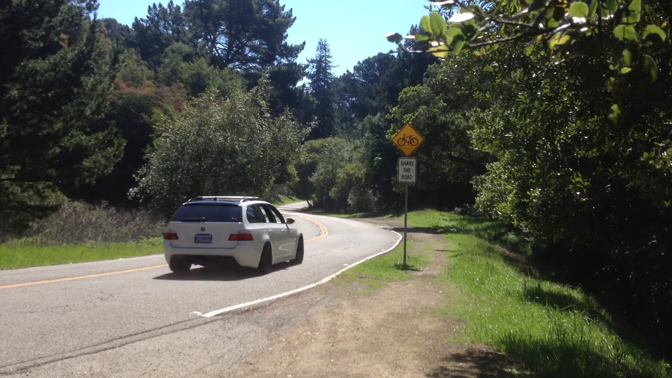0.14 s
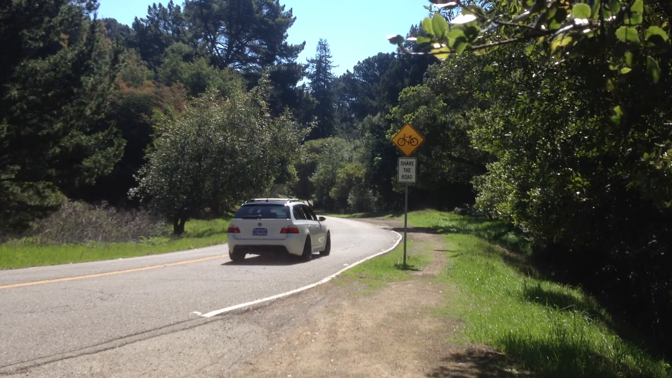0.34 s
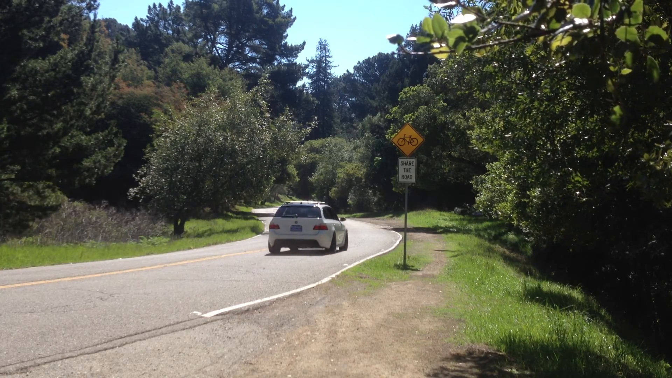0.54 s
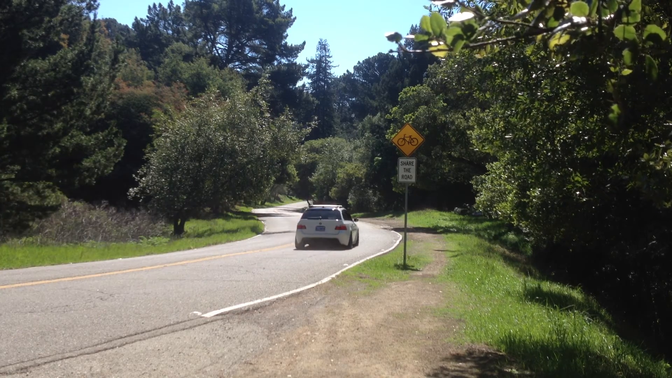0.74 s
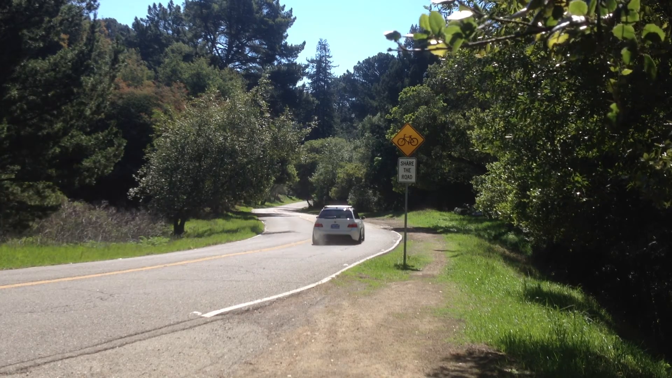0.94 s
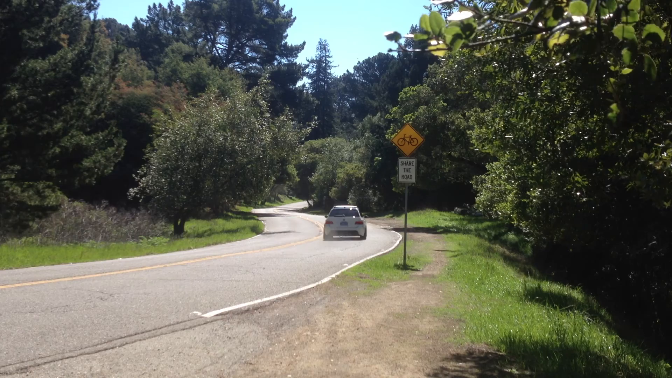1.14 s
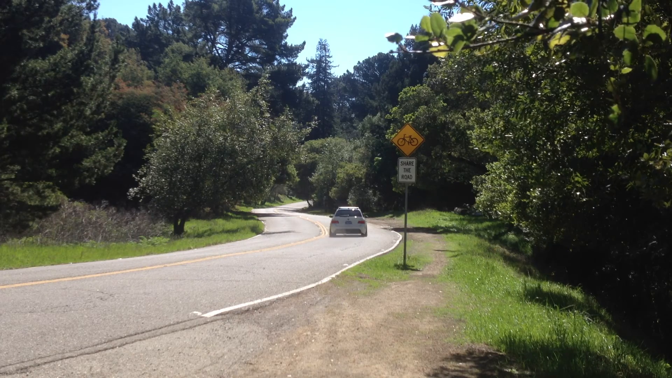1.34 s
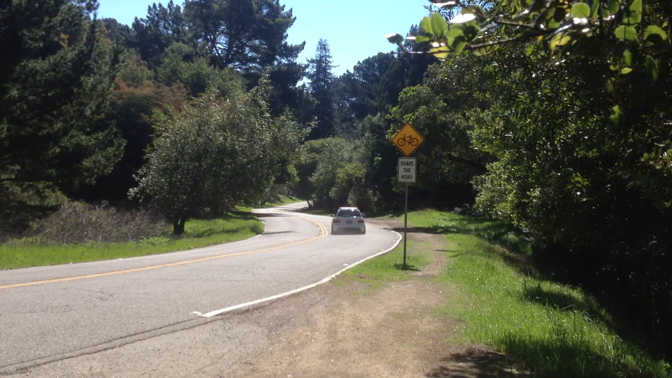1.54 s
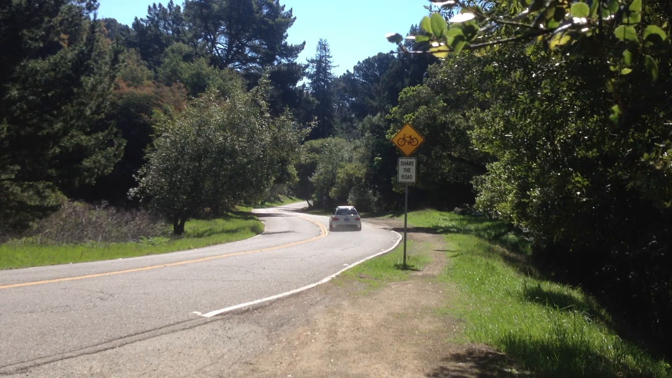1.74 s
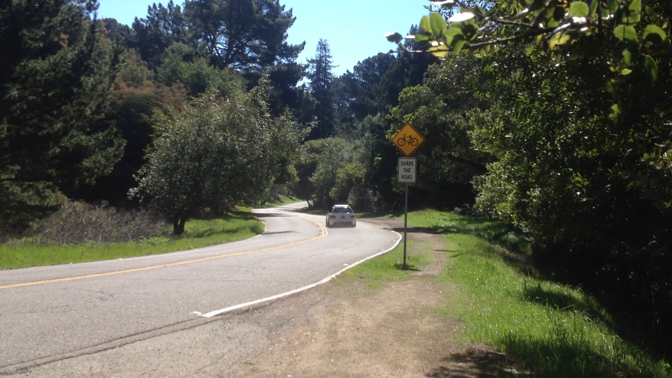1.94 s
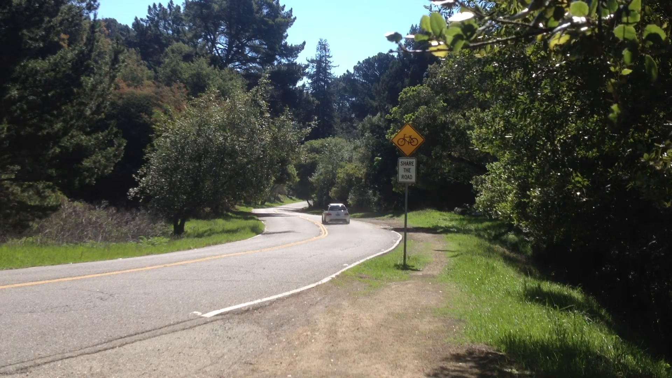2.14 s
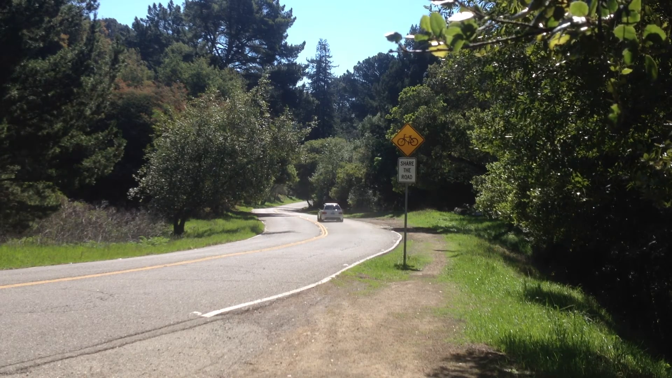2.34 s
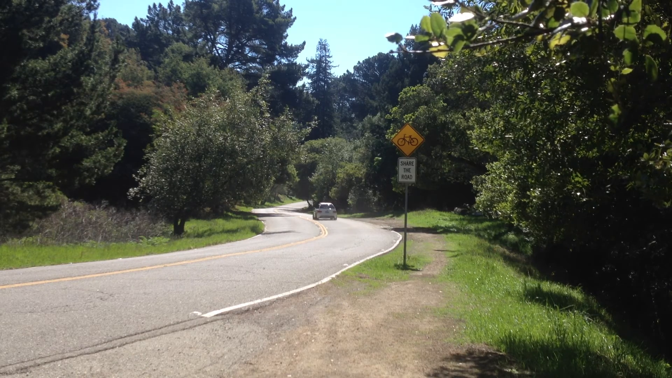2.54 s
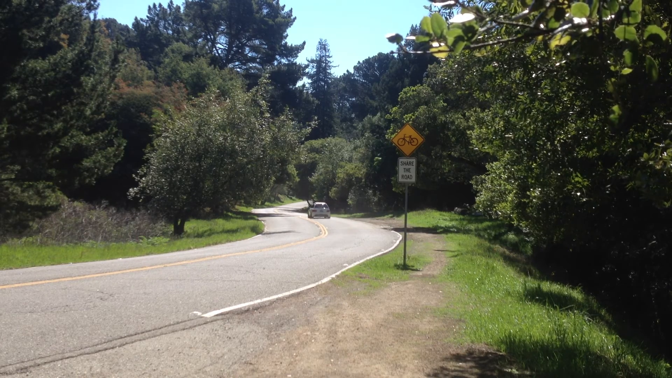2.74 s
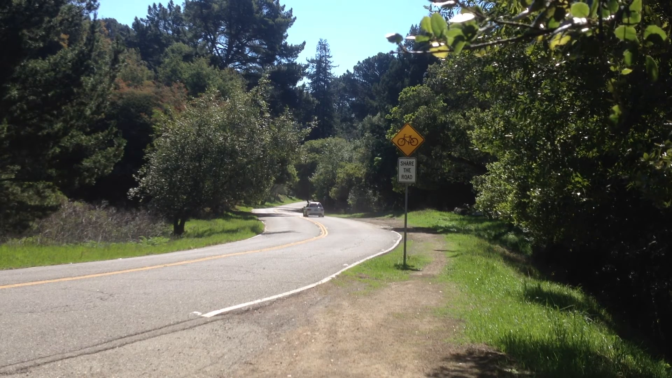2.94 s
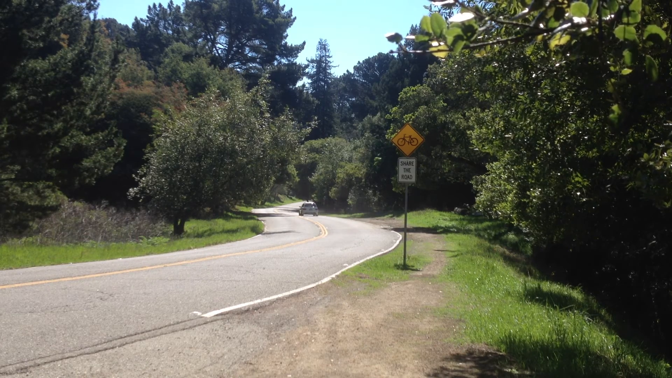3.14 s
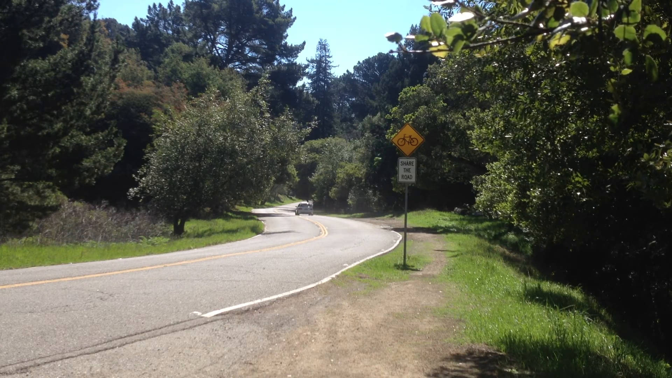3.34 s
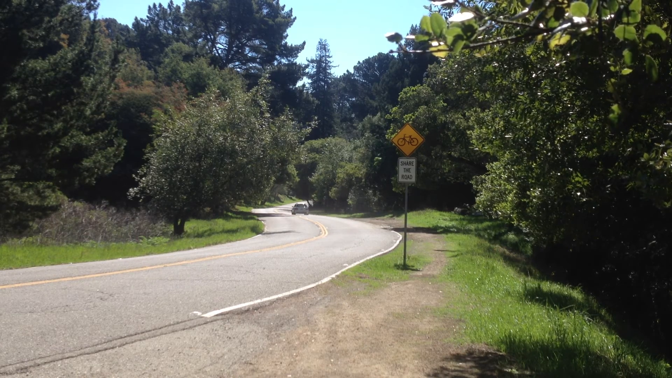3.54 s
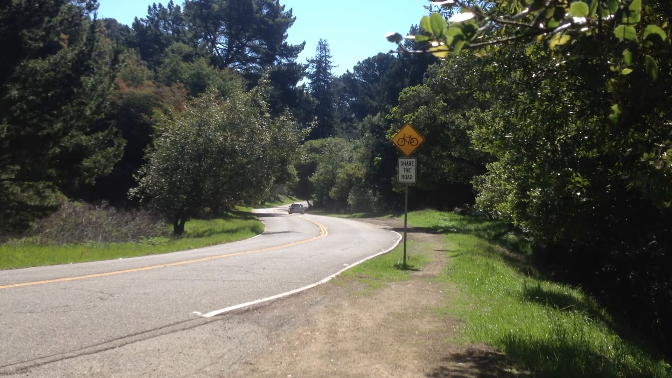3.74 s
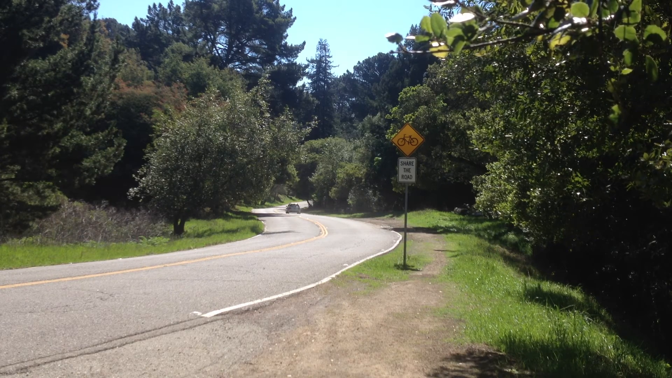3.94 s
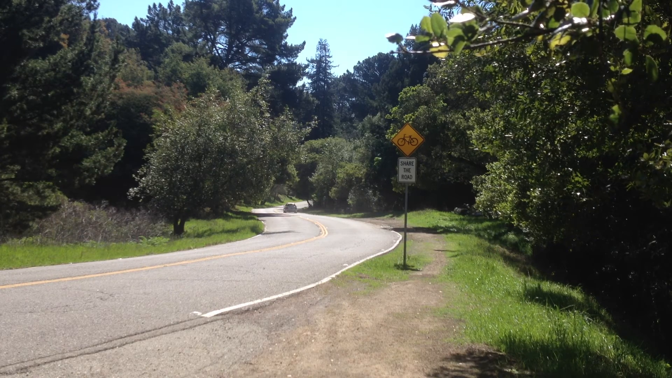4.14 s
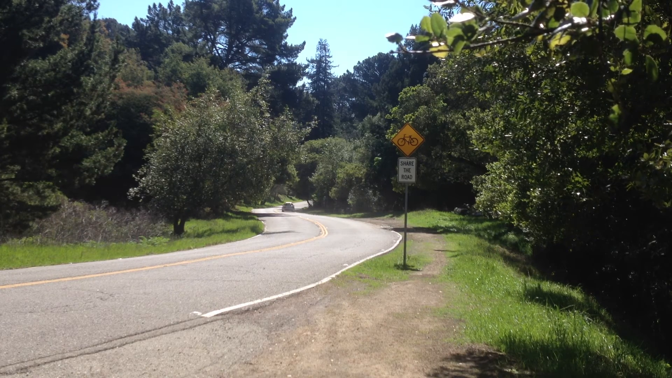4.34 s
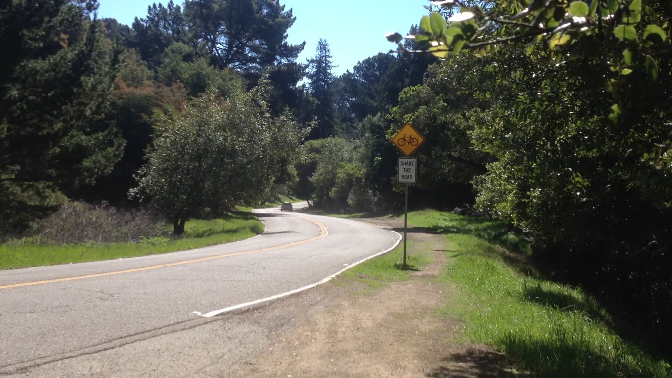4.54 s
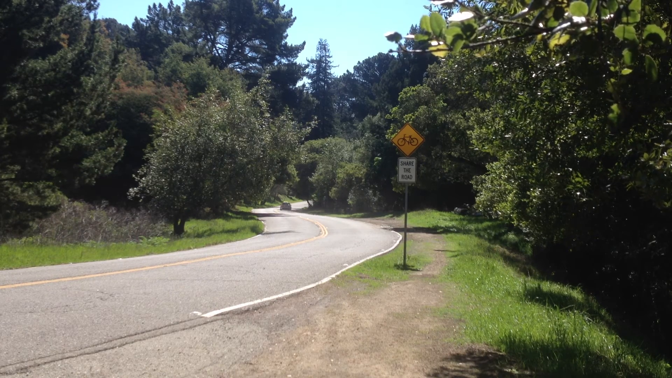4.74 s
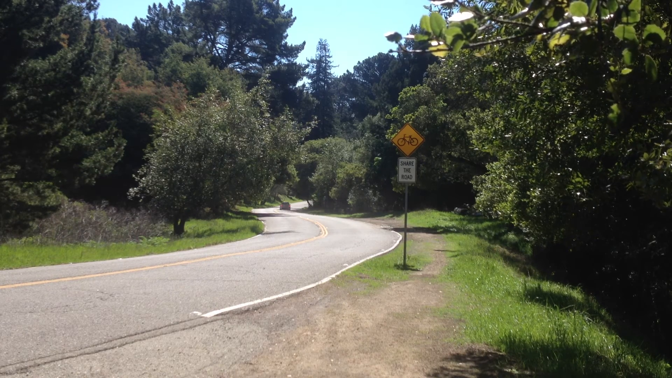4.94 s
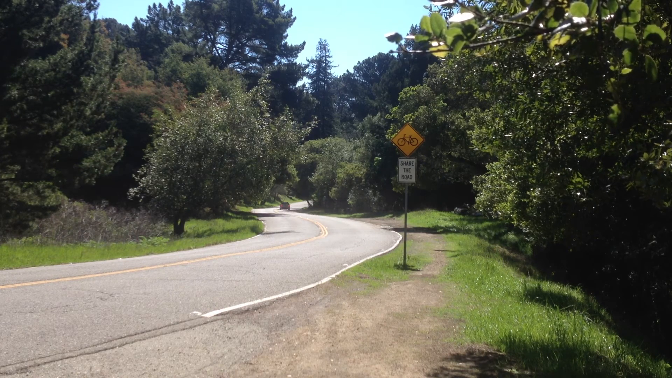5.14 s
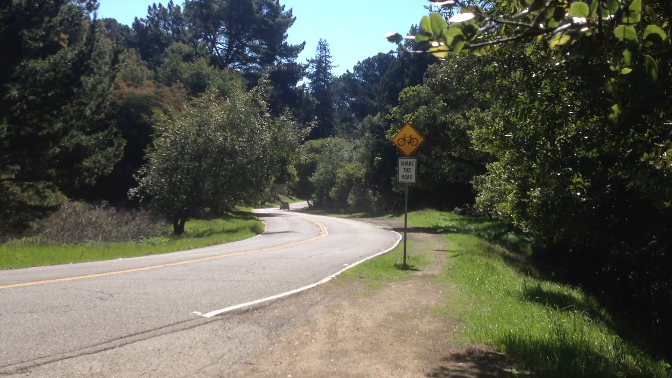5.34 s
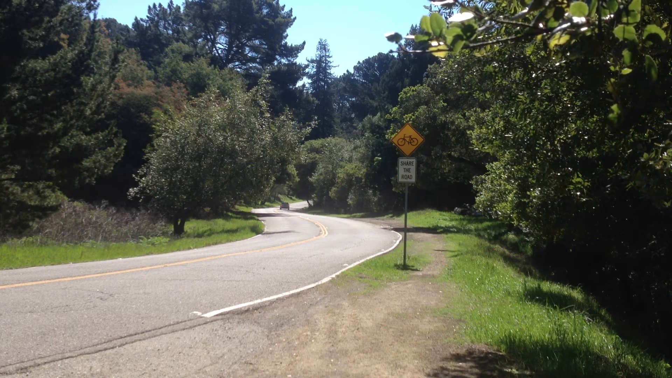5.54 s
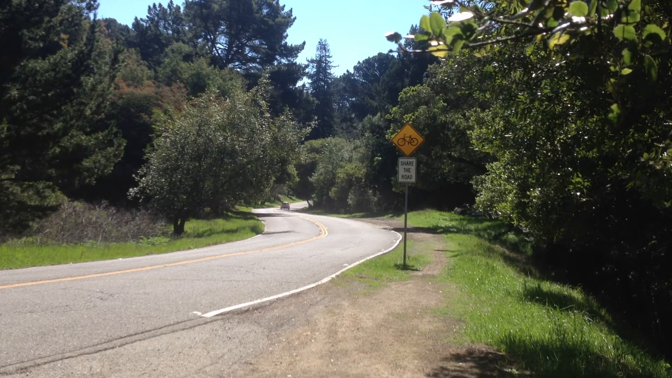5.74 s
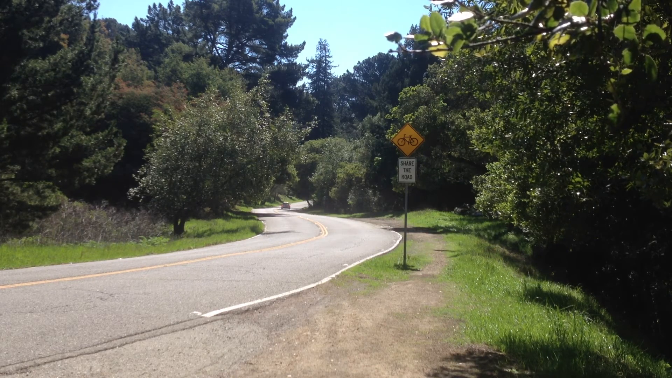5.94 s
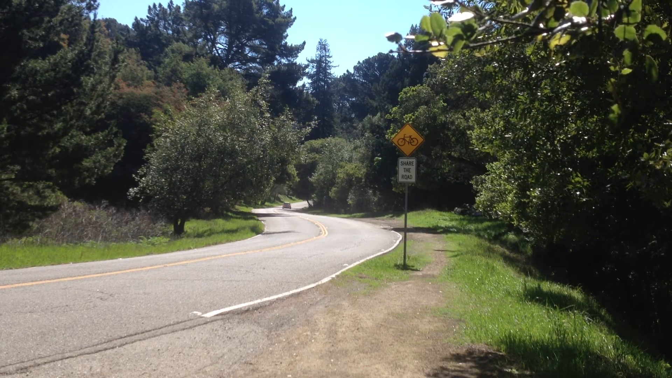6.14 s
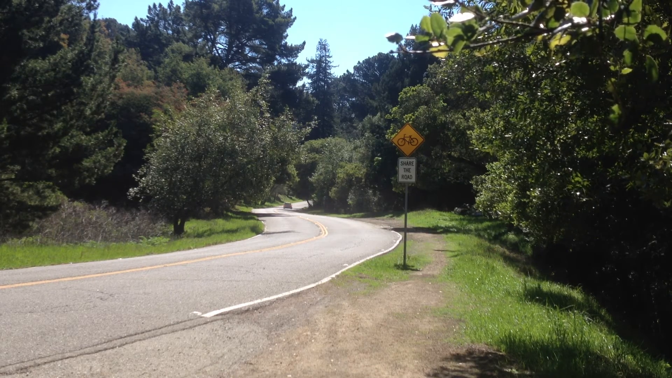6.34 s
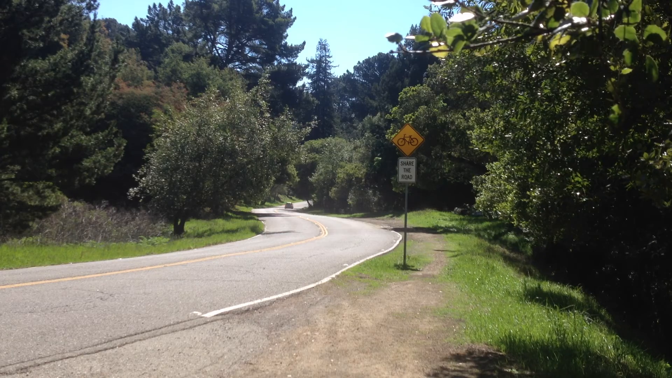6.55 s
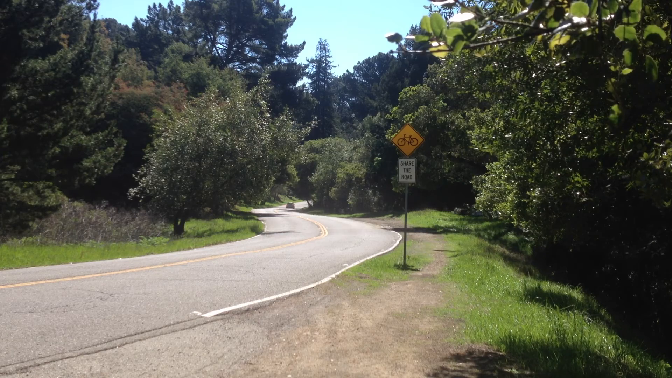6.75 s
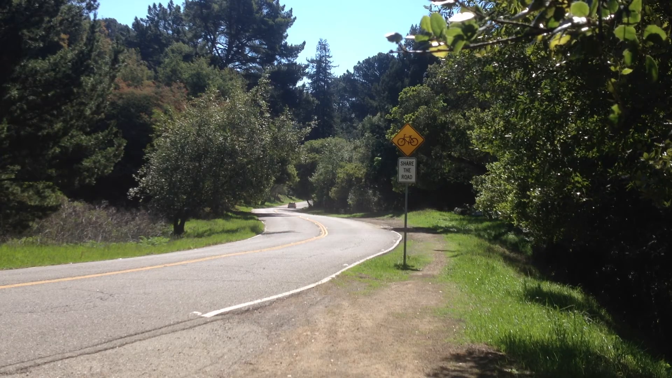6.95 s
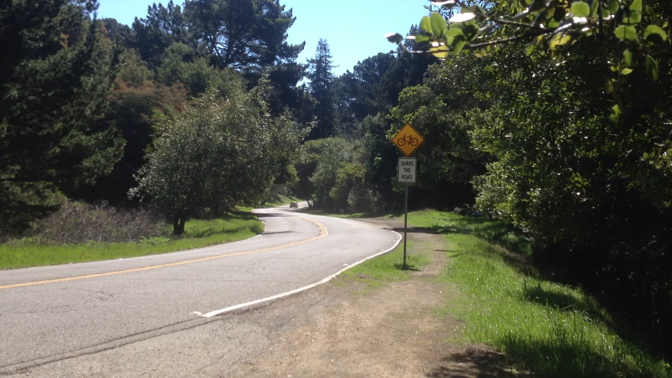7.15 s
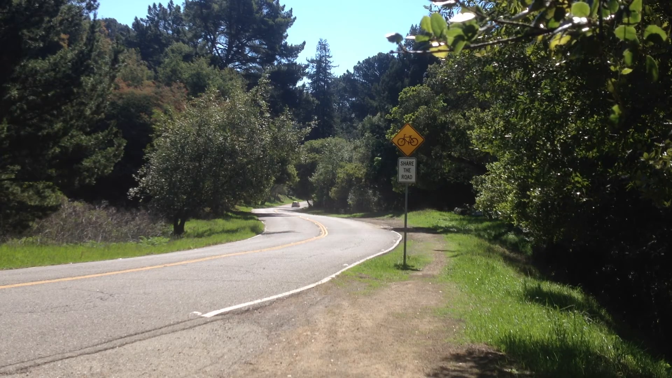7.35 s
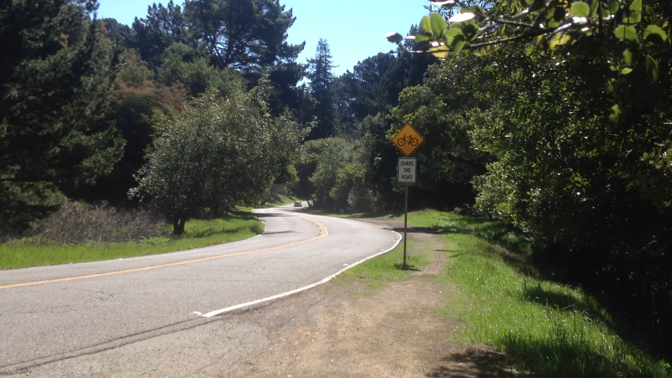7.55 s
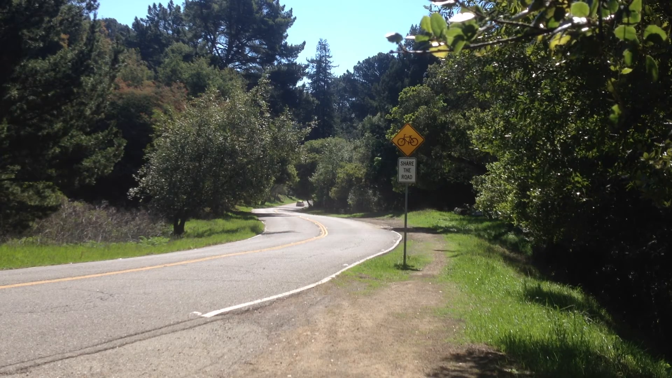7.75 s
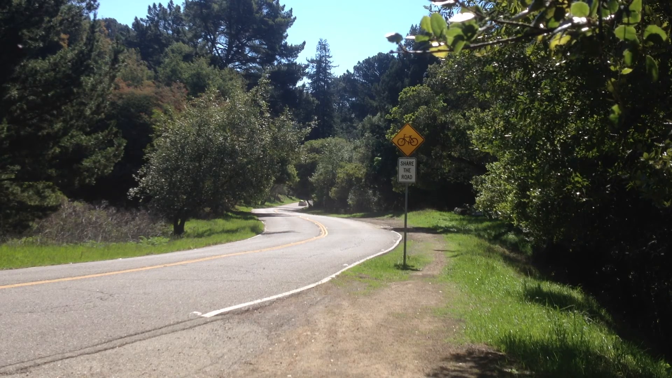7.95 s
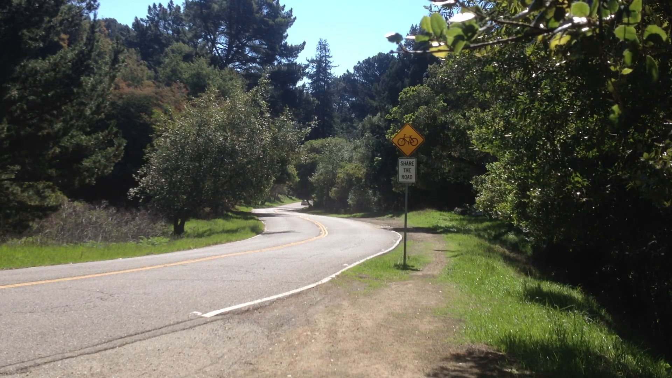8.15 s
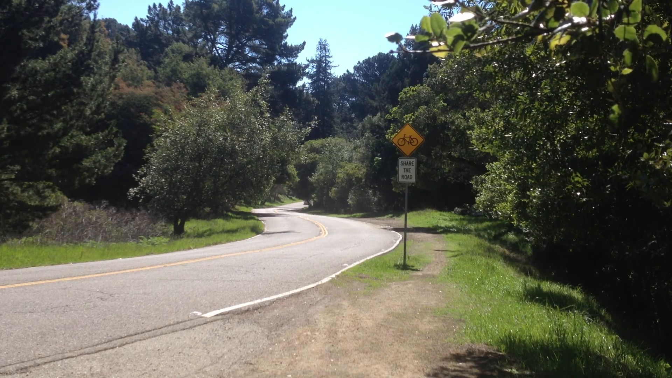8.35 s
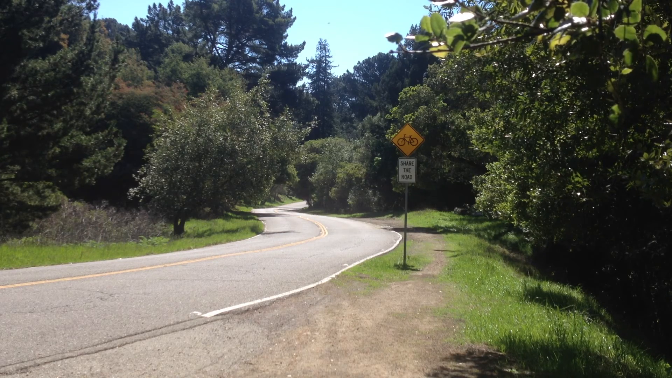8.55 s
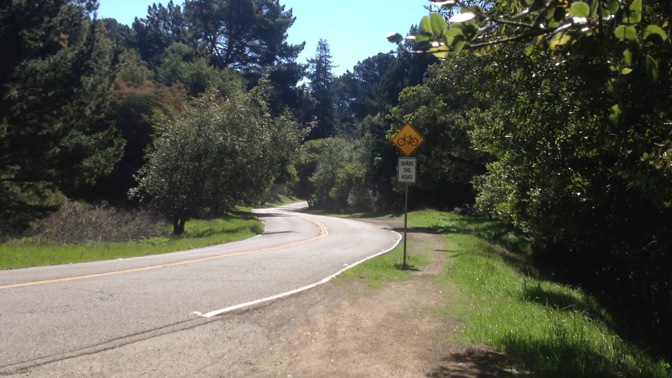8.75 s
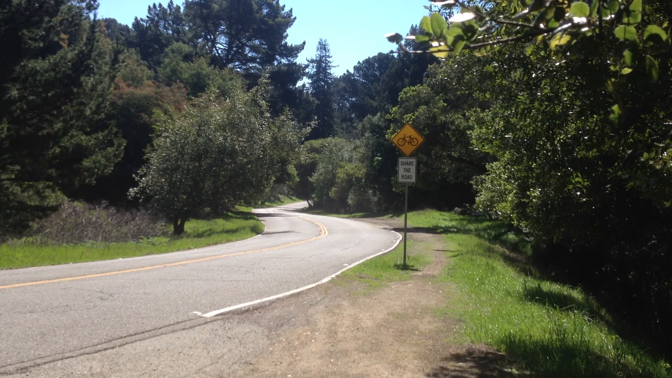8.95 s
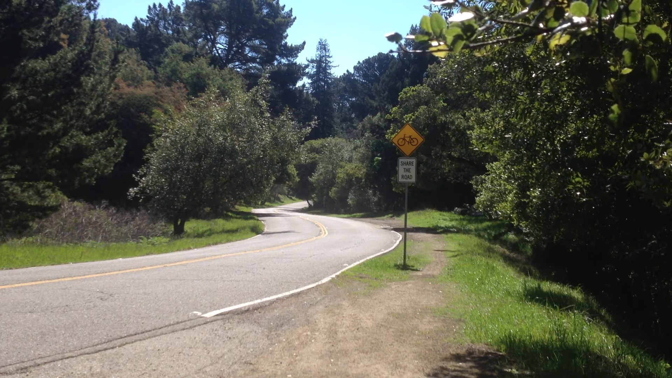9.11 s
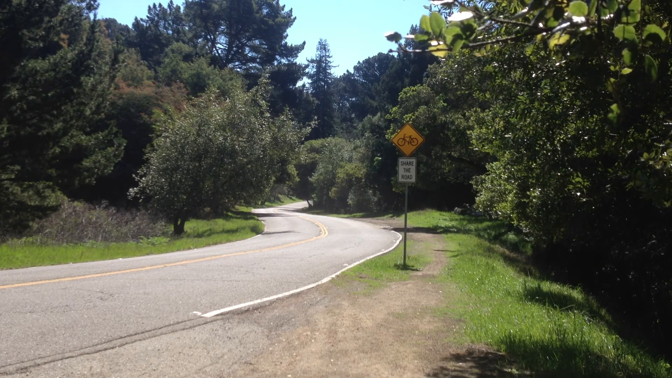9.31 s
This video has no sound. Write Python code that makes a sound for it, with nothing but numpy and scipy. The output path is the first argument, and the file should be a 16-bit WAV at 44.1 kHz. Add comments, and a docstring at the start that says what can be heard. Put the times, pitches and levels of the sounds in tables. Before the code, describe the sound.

Outdoors on a wooded road, one fixed mono microphone with thin bass and soft background hiss. At 0 s a loud six-cylinder car is already close, driving away at full throttle: a buzzy, smooth exhaust note with rasp, gassy roar and rushing air. Its octave swells around 0.8 s. The pitch climbs steadily until 3.3 s while level and treble fall; trees add a thin echo. Broad tyre roar grows around 2.4 s. At 3.3-3.8 s the pitch drops through an upshift with a small gust, then the car pulls briefly. A stronger puff at 4.5 s ends as the throttle shuts. From 5 s a faint, slowly sinking drone lies under hollow tyre howl, swelling near 6 s and fading strongly after 8 s. A small bird gives a very faint warble at 6.1 s, then clearer quick high whistles at 7.2-8.4 s and a tiny peep at 9.15 s. A barely audible insect hiss persists to 9.5 s.

```python
"""A six-cylinder car with a loud exhaust pulls away at full throttle along a wooded road.
It shifts up, pulls on briefly, then lifts off and coasts with a faint drone under the roar of its tyres.
The exhaust note is a sum of wavering sine waves tied to the engine's turning; gas, tyres and air are shaped noise.
Air dulls the rasp, roar and rushing air as the car recedes, and trees echo its note.
A small bird whistles gliding sine notes nearby; the still wood and a faint insect are steady noise."""
import sys
import numpy as np
from scipy import signal
from scipy.fft import rfft, irfft, next_fast_len
from scipy.io import wavfile
from scipy.ndimage import map_coordinates

SR = 44100
rng = np.random.default_rng(int(sys.argv[2]) if len(sys.argv) > 2 else 0)


def int16_out(signal):
    """Quantize to a 16-bit WAV file."""
    q = np.round(np.clip(np.atleast_2d(signal).T, -1, 1) * 32767)
    wavfile.write(sys.argv[1], SR, q.astype(np.int16))


N = 418047
TIME_S = np.arange(N) / SR

# In all noise spectra below, level_db gives the shape only: the noise is then scaled to rms 1.

# Engine speed under power, with the upshift: start_s, firing rate of one bank of three cylinders (bank_hz)
PULL_REVS = [(0.0, 99.7), (1.24, 125.1), (1.48, 129.9), (2.05, 140.2), (3.31, 160.4), (3.36, 156.3),
             (3.54, 135.3), (3.7, 116.2), (3.8, 113), (3.88, 111.8), (4.04, 111.5), (4.4, 115.6),
             (4.55, 107.0)]
# Firing note under power: start_s, level_db before a small trim
PULL_NOTE_LEVEL = [(0, -15.5), (.35, -17.5), (.6, -22), (.83, -21), (1.05, -22.5), (1.5, -20), (2.0, -22.5),
                   (2.2, -24), (2.35, -22), (2.72, -23), (3.02, -26.6), (3.3, -27.5), (3.45, -24.4),
                   (3.6, -25.5), (3.75, -29.5), (4.05, -30), (4.28, -34.5), (4.42, -29.5)]
# Weak lines from unequal cylinders under power: order (multiple of the four-stroke cycle rate), relative level_db
PULL_ORDERS = [(3, -3), (4, -11.5), (5, -15), (7, -14), (8, -7), (10, -10), (11, -19.5), (14, -12),
               (15, -10), (16, -8.5)]
# Pipe resonances that the overtones sweep through: pitch_hz, level_db relative to the firing note
PIPE_RESONANCES = [(300, -10.5), (330, -16.5), (360, -9.5), (385, -8.5), (404, -6.3), (420, -7),
                   (447, -14.5), (475, -13.5), (500, -12.5), (560, -7.5), (600, -15), (640, -11.5)]
# Gusts of gas in the upshift and before the lift: centre_s, width_s, exhaust_rise_db, rushing_air_rise_db
GUSTS = [(3.53, .06, 3, 0), (4.46, .085, 5.5, 3.5)]
# Noise of the gas flow: pitch_hz, level_db
GAS_SPECTRUM = [(30, -24), (60, -17), (85, -15.5), (125, -6.5), (200, -3), (330, 1), (560, 3), (750, -2),
                (1100, -10), (2500, -32)]
# Rasp close to the car: pitch_hz, level_db
RASP_SPECTRUM = [(700, -13), (1200, 0), (1600, 0.7), (1850, 0), (2300, -0.7), (2800, -3.5), (3400, -6.1),
                 (4000, -8.5), (4600, -11), (5200, -18), (8000, -28.5)]
# Rasp in the low treble: start_s, level_db before a trim
RASP_LEVEL = [(0, -41.5), (.35, -43.5), (.52, -46.5), (.75, -41), (.95, -42.5), (1.07, -46.8), (1.6, -43),
              (2.1, -40), (2.55, -40), (2.87, -42.5), (3.22, -41), (3.48, -49.6), (4.45, -50), (4.7, -57.5),
              (5.1, -54), (5.4, -56), (7.2, -60), (9.48, -71)]
# Bark of the pipes: pitch_hz, level_db
BARK_SPECTRUM = [(1200, -21), (1500, -4), (1600, 0.5), (1750, -4), (2100, -1.5), (2500, -9.5), (3200, -23)]
# Broad tyre roar close to the car: pitch_hz, level_db
TYRE_SPECTRUM = [(120, -31), (250, -22.5), (450, -18), (620, -12.5), (760, -1), (860, -1), (1000, -1),
                 (1150, 1), (1350, -1.5), (1600, -9), (2200, -17.5), (4000, -27.5)]
# Tyre loudness, before each part's own trim: start_s, level_db
TYRE_LEVEL = [(0, -33.3), (.45, -33.2), (.55, -35.5), (.9, -35), (1.03, -40), (2.4, -31), (2.85, -33),
              (3.3, -33), (4.05, -33.5), (4.5, -35.8), (5.4, -42), (5.9, -40), (6.3, -44.5), (6.9, -42.5),
              (8.1, -46), (8.65, -55), (9.48, -59.5)]
# Tyre roar's pitch, which rises and falls with road speed: start_s, ratio to its spectrum
TREAD_PITCH = [(0, 0.96), (1.2, 0.96), (2.3, 1.114), (3.2, 1.04), (4, 0.96), (5, 0.95), (6, 1.0), (7, 0.98),
               (8, 0.89), (9.48, .97)]
# Lower resonance of the tread: pitch_hz, level_db
LOW_HOWL_SPECTRUM = [(620, -18.5), (700, -0.5), (750, -1), (800, -3.5), (900, -21)]
# Upper resonance of the tread: pitch_hz, level_db
HIGH_HOWL_SPECTRUM = [(820, -19.5), (900, -1.5), (940, 1.5), (990, -10), (1100, -19.5)]
# The tread howls louder in the bends: centre_s, width_s, lower_howl_rise_db, upper_howl_rise_db
HOWL_SWELLS = [(2.45, .55, 8, 5.5), (4.1, 0.65, 4, 3.5), (6.1, 0.38, 1, 6), (7.7, 0.85, 7.5, 2)]
# Road and body rumble: pitch_hz, level_db
RUMBLE_SPECTRUM = [(55, -18), (85, -2), (120, .3), (200, .5), (280, -5), (400, -8.5), (600, -24.5)]
# Rushing air close to the car: pitch_hz, level_db
RUSH_SPECTRUM = [(3000, -22.5), (4500, -6.5), (5400, 1.2), (8000, -0.1), (10000, -4), (12000, -6.5),
                 (15000, -6)]
# The still wood with the microphone's own hiss: pitch_hz, level_db
STILL_SPECTRUM = [(30, -10), (60, -5), (85, -2.5), (130, 5.5), (250, -8), (600, -14), (1200, -9.5),
                  (1600, -7.5), (2100, -16), (3000, -23), (4500, -26), (6500, -29), (10000, -35),
                  (14500, -29.5)]
# Narrow band of a far-off insect: pitch_hz, level_db
INSECT_SPECTRUM = [(6450, -28.5), (6620, -1), (6790, -29.5)]
# Engine speed while coasting: start_s, firing rate of one bank of three cylinders (bank_hz)
COAST_REVS = [(4.5, 113), (5.05, 110.2), (5.5, 107.6), (6.5, 97.5), (7.1, 94.4), (7.5, 91.65), (8.5, 87.3),
              (9.48, 83.9)]
# Overtones while coasting: order (multiple of the four-stroke cycle rate), relative level_db
COAST_ORDERS = [(3, -10.5), (11, -20), (13, -10.5), (14, -10.5), (15, -11.5), (16, -2.5), (17, -16),
                (18, -4.5)]
# Bird notes: start_s, length_s, start_hz, middle_hz, end_hz, level_db, warble_hz (swing to each side)
BIRD_NOTES = [(6.11, .2, 7180, 6950, 7000, -84, 130), (7.163, .06, 7650, 7730, 7280, -82, 58),
              (7.22, 0.26, 7280, 7104, 7100, -73.5, 130), (7.598, .08, 5650, 5300, 5750, -73, 0),
              (7.675, 0.063, 5650, 6400, 6350, -70, 0), (7.798, 0.058, 6200, 6250, 5850, -70, 3),
              (7.913, 0.036, 5480, 5460, 5000, -73, 7), (7.96, .05, 5200, 5320, 5050, -73.5, -1),
              (8.08, 0.1, 5100, 4850, 4620, -80, 30), (8.182, .025, 5000, 5650, 5900, -68, 2),
              (8.196, .035, 5850, 5940, 5900, -66, 0), (8.281, .07, 7040, 6980, 6960, -80, 35),
              (8.365, .07, 7000, 7150, 7000, -80, 200), (9.15, 0.048, 6300, 6300, 6280, -83, 0)]
# Peaks and dips of the microphone's port: pitch_hz, width_hz, level_db
PORT_RESONANCES = [(1570, 29, 3.5), (4660, 550, 2.5), (5260, 600, -2), (8000, 1400, 1.5)]

START_M, SPEED_M_PER_S = 4.8, 28   # the car's distance grows steadily
AIR_DB = 0.0105   # treble loss per metre at 1 kHz
LIFT_S, LIFT_TAKES_S = 4.529, .014   # the throttle shuts
BLOOM_S, BLOOM_WIDTH_S, BLOOM_DB = .76, .225, 14.5   # the octave swells once as the car draws away
AIM_ENDS_S, AIM_TURN_S = 0.51, 0.021   # until then the tailpipes point at the listener
BLARE_DB, OFF_AIM_DB = -11.7, -16   # third harmonic relative to the firing note, and its drop after that
FLOW_DB, FLOW_FOLLOWS = -15.6, .82   # gas flow under power: offset, share of the note's dB
COAST_GAS_DB = -12.5   # gas flow while coasting, relative to the tyre level
# Bark relative to the note; below this bank rate it gets weaker by so many dB per Hz
BARK_DB, BARK_FROM_HZ, BARK_DB_PER_HZ = -20, 142.3, .9
ROAR_DB, ROAR_DB_PER_M = -0.72, -0.0018   # with distance the broad roar gives way to the howl
LOW_HOWL_DB, HIGH_HOWL_DB, HOWL_DB_PER_M = -17.5, -15.5, 0.0339   # relative to the tyre level
RUMBLE_DB, RUMBLE_DB_PER_M = -47.5, -0.0469
OVERRUN_S, OVERRUN_WIDTH_S, OVERRUN_DB = 4.9, .7, 5.5   # rumble grows while the engine brakes the car
# Rushing air: offset, change with distance, share of the rasp's dB
RUSH_DB, RUSH_DB_PER_M, RUSH_FOLLOWS = -27, -0.127, .5
STILL_DB, INSECT_DB = -62.5, -92.5
COAST_NOTE_DB, COAST_NOTE_DB_PER_S = -53, -1.1   # firing note after the lift
COAST_OCTAVE_DB, COAST_OCTAVE_DB_PER_S = -44, -6.5   # its octave dies faster
DRONE_DB = -11   # the other overtones, relative to the tyre level
DRONE_S, DRONE_RISE_S, DRONE_HELD_DB = 5.06, .04, -12   # overtones are held down, then open up
DRONE_TOP_HZ = 596   # the silencer swallows coasting overtones above this
LOW_CUT_HZ, CUTOFF_HZ = 128.5, 15250


def from_db(db):
    """Decibels to gain."""
    return 10 ** (np.asarray(db) / 20)


def rms_one(x):
    """Scale to an rms of 1."""
    return x / np.sqrt(np.mean(x ** 2) + 1e-20)


def in_time(rows):
    """Join a table's points by straight lines to get a value at every sample."""
    s, values = np.transpose(rows)
    return np.interp(TIME_S, s, values)


def after(s, rise_s):
    """A smooth step from 0 to 1 around time s."""
    return .5 + .5 * np.tanh((TIME_S - s) / (2 * rise_s))


def swell(s, width_s):
    """A bell of height 1 around time s."""
    return np.exp(-((TIME_S - s) / width_s) ** 2)


def drift(rate_hz):
    """Smooth random wandering of rms 1, with most of its motion below about this rate."""
    # made at every 40th sample; the first 2000 values let the filter settle
    pole = np.exp(-80 * np.pi * rate_hz / SR)
    steps = rng.standard_normal(N // 40 + 2002)
    slow = signal.lfilter([1], [1, -2 * pole, pole * pole], steps)[2000:]
    return np.interp(np.arange(N) / 40, np.arange(len(slow)), rms_one(slow))


def coloured(spectrum):
    """Noise of rms 1 with the given spectrum, falling away beyond its ends."""
    size = next_fast_len(N)
    hz, db = np.transpose(spectrum)
    log_hz = np.log(np.arange(1, size // 2 + 2) * SR / size)
    beyond = np.abs(log_hz - np.clip(log_hz, np.log(hz[0]), np.log(hz[-1])))
    gain = from_db(np.interp(log_hz, np.log(hz), db) - 20 * beyond)
    return rms_one(irfft(rfft(rng.standard_normal(size)) * gain, size)[:N])


def distance():
    """Metres from the listener to the car."""
    return START_M + SPEED_M_PER_S * TIME_S


def through_air(x, metres, count=7):
    """Air absorbs the treble with distance: blend between a few ranges, each at rms 1."""
    size = next_fast_len(N)
    spectrum = rfft(x, size)
    khz = np.arange(size // 2 + 1) * SR / size / 1000
    loss_db_per_m = AIR_DB * khz ** 1.326
    ranges = np.linspace(metres.min(), metres.max(), count)
    out = 0
    for range_m, share in zip(ranges, np.eye(count)):
        dulled = irfft(spectrum * from_db(-range_m * loss_db_per_m), size)[:N]
        out = out + np.interp(metres, ranges, share) * rms_one(dulled)
    return out


def trees(x, t60, wet_db):
    """Trunks and leaves scatter a thin tail of echoes, which dies by 60 dB in t60 seconds."""
    t = np.arange(SR) / SR
    tail = rng.standard_normal(SR) * from_db(-60 * t / t60) * (1 - np.exp(-t / 0.021))
    echoes = signal.fftconvolve(x, tail / np.linalg.norm(tail))[:N]
    return x + from_db(wet_db) * echoes


def throttle():
    """1 under power, 0 after the lift."""
    return 1 - after(LIFT_S, LIFT_TAKES_S)


def gusts_db():
    """Rise of the exhaust and of the rushing air during each gust."""
    return sum(np.outer(rises_db, swell(s, width_s)) for s, width_s, *rises_db in GUSTS)


def crank(bank_hz, jitter):
    """Angle through the four-stroke cycle, in which each bank fires three times."""
    return 2 * np.pi * np.cumsum(bank_hz * (1 + jitter * drift(25))) / (3 * SR)


def line(angle, order, db, waver_db, rough):
    """One sine at a multiple of the cycle rate, wavering in level and trembling in level and phase."""
    # multiples of the firing rate (order 6) line up into one pulse per firing; others start anywhere
    start = rng.uniform(0, 2 * np.pi) * (order % 6 > 0)
    phase = order * angle + start + rough * drift(45)
    level = from_db(db + waver_db * drift(5.7)) * (1 + rough * drift(45))
    return -np.sqrt(2) * level * np.cos(phase)


def pipe_db(hz):
    """The exhaust pipe's resonances set the level of an overtone by its pitch."""
    return np.interp(hz, *np.transpose(PIPE_RESONANCES))


def pulling(bank_hz, note_db, flow_db, gust_db):
    """The firings at full throttle make a note with overtones; also gives the angle that paces the puffs."""
    angle = crank(bank_hz, jitter=0.00093)
    overtone_db = note_db + gust_db
    bloom_db = BLOOM_DB * swell(BLOOM_S, BLOOM_WIDTH_S)
    octave_db = overtone_db + pipe_db(4 * bank_hz) + bloom_db
    blare_db = BLARE_DB + OFF_AIM_DB * after(AIM_ENDS_S, AIM_TURN_S)
    note = line(angle, order=6, db=note_db + 0.24, waver_db=0.7, rough=0.031)
    note += line(angle, order=9, db=overtone_db + pipe_db(3 * bank_hz), waver_db=1.1, rough=0.05)
    note += line(angle, order=12, db=octave_db, waver_db=1.1, rough=0.067)
    note += line(angle, order=18, db=overtone_db + blare_db, waver_db=1.5, rough=.07)
    for order, db in PULL_ORDERS:
        # the small tailpipes radiate poorly below their cut-off of 112 Hz
        radiated_db = -10 * np.log10(1 + (112 / (order * bank_hz / 3)) ** 16)
        note += line(angle, order, flow_db + db + radiated_db - 4, waver_db=2.0, rough=0.074)
    return note * throttle(), angle


def puffs(angle, depth):
    """Under power the gas leaves in one puff per firing."""
    return 1 + depth * throttle() * np.cos(6 * angle)


def gas(flow_db, tyre_db, angle):
    """Turbulent gas hisses out of the pipes, in puffs under power and more weakly while coasting."""
    power_level = throttle() * from_db(flow_db)
    coast_level = (1 - throttle()) * from_db(tyre_db + COAST_GAS_DB)
    return (power_level + coast_level) * coloured(GAS_SPECTRUM) * puffs(angle, depth=.15)


def rasp(rasp_db, metres, angle):
    """Flickering treble noise that pulses with the firings and is dulled by the air."""
    level = from_db(rasp_db + 2.5 + .6 * drift(22))
    return level * through_air(coloured(RASP_SPECTRUM), metres) * puffs(angle, depth=0.14)


def bark(bank_hz, note_db, angle):
    """The pipes bark at high revs: a band of noise that pulses with each firing."""
    low_revs_hz = np.maximum(BARK_FROM_HZ - bank_hz, 0)
    level = from_db(note_db + BARK_DB - BARK_DB_PER_HZ * low_revs_hz)
    return level * throttle() * coloured(BARK_SPECTRUM) * puffs(angle, depth=0.37)


def at_speed(noise, ratio):
    """Play noise faster or slower, so that its resonances shift."""
    return map_coordinates(noise, [np.cumsum(ratio)], order=3, mode="mirror")


def tyres(tyre_db, metres):
    """A broad roar that follows road speed, two howling tread resonances and a low rumble."""
    tread = at_speed(coloured(TYRE_SPECTRUM), in_time(TREAD_PITCH))
    roar = from_db(ROAR_DB + ROAR_DB_PER_M * metres) * through_air(tread, metres)
    low_db, high_db = sum(np.outer(rises_db, swell(s, width_s)) for s, width_s, *rises_db in HOWL_SWELLS)
    low_howl = from_db(LOW_HOWL_DB + low_db) * coloured(LOW_HOWL_SPECTRUM)
    high_howl = from_db(HIGH_HOWL_DB + high_db) * coloured(HIGH_HOWL_SPECTRUM)
    howl = from_db(HOWL_DB_PER_M * metres) * (low_howl + high_howl)
    flutter_db = 1.05 * drift(25)   # from turbulent air
    overrun_db = OVERRUN_DB * swell(OVERRUN_S, OVERRUN_WIDTH_S)
    rumble = from_db(RUMBLE_DB + RUMBLE_DB_PER_M * metres + overrun_db) * coloured(RUMBLE_SPECTRUM)
    return from_db(tyre_db + flutter_db) * (roar + howl) + rumble


def rushing_air(rasp_db, air_gust_db, metres, angle):
    """High hissing noise that partly follows the rasp, swells in the gusts and fades with distance."""
    level = from_db(RUSH_DB + RUSH_DB_PER_M * metres + RUSH_FOLLOWS * rasp_db + air_gust_db)
    return level * through_air(coloured(RUSH_SPECTRUM), metres) * puffs(angle, depth=.12)


def still_wood():
    """Steady noise of the wood and the microphone's hiss."""
    return from_db(STILL_DB) * coloured(STILL_SPECTRUM)


def insect():
    """A far-off insect, heard as a thin, very faint band of noise."""
    return from_db(INSECT_DB) * coloured(INSECT_SPECTRUM)


def coasting(tyre_db):
    """With the throttle shut the note is weak, sinks slowly and shows more of the uneven orders."""
    bank_hz = in_time(COAST_REVS)
    angle = crank(bank_hz, jitter=0.00057)
    since_s = np.maximum(TIME_S - LIFT_S, 0)
    held_db = DRONE_HELD_DB * (1 - after(DRONE_S, DRONE_RISE_S))
    note_db = COAST_NOTE_DB + COAST_NOTE_DB_PER_S * since_s
    octave_db = COAST_OCTAVE_DB + COAST_OCTAVE_DB_PER_S * since_s + held_db
    note = line(angle, order=6, db=note_db, waver_db=2.0, rough=0.071)
    note += line(angle, order=12, db=octave_db, waver_db=2.2, rough=0.07)
    for order, db in COAST_ORDERS:
        muffled_db = -10 * np.log10(1 + (order * bank_hz / 3 / DRONE_TOP_HZ) ** 40)
        drone_db = tyre_db + DRONE_DB + held_db + muffled_db + db
        note += line(angle, order, drone_db, waver_db=1.5, rough=0.087)
    return note * (1 - throttle())


def car():
    """Add up the exhaust note with its echoes, gas, rasp, bark, tyres and rushing air."""
    bank_hz, note_db = in_time(PULL_REVS), in_time(PULL_NOTE_LEVEL)
    tyre_db, rasp_db = in_time(TYRE_LEVEL), in_time(RASP_LEVEL)
    metres = distance()
    gust_db, air_gust_db = gusts_db()
    flow_db = FLOW_DB + FLOW_FOLLOWS * note_db + gust_db
    note, angle = pulling(bank_hz, note_db, flow_db, gust_db)
    out = trees(note + coasting(tyre_db), t60=0.75, wet_db=-23)
    out += gas(flow_db, tyre_db, angle)
    out += rasp(rasp_db, metres, angle)
    out += bark(bank_hz, note_db, angle)
    out += tyres(tyre_db, metres)
    return out + rushing_air(rasp_db, air_gust_db, metres, angle)


def bird():
    """Thin whistled notes, each an arc through three pitches, some with a quick warble."""
    out = np.zeros(N)
    for s, length_s, start_hz, middle_hz, end_hz, db, warble_hz in BIRD_NOTES:
        u = np.linspace(0, 1, int(length_s * SR))   # progress through the note
        hz = np.polyval(np.polyfit([0, .5, 1], [start_hz, middle_hz, end_hz], 2), u)
        hz += warble_hz * np.sin(2 * np.pi * 27 * length_s * u)   # 27 warbles a second
        envelope = np.sqrt(4 * u * (1 - u))
        note = np.sqrt(2) * from_db(db) * envelope * np.sin(2 * np.pi * np.cumsum(hz) / SR)
        at = int(s * SR)
        out[at:at + len(u)] += note[:N - at]
    return trees(out, t60=.4, wet_db=-11)


def scene():
    """The car, the still wood, an insect and the bird, in one channel."""
    return (car() + still_wood() + insect() + bird())[None]


def record(dry):
    """The port colours the sound, a wind filter thins the bass, the top is cut steeply."""
    dry = dry * np.minimum(np.arange(N) / (.008 * SR), 1)   # fade in over 8 ms
    for hz, width_hz, db in PORT_RESONANCES:
        dry = dry + (from_db(db) - 1) * signal.lfilter(*signal.iirpeak(hz, hz / width_hz, fs=SR), dry)
    thinned = signal.sosfilt(signal.butter(3, LOW_CUT_HZ, "high", fs=SR, output="sos"), dry)
    return signal.sosfilt(signal.ellip(12, .1, 90, CUTOFF_HZ, fs=SR, output="sos"), thinned)


dry = scene()
out = record(dry)
int16_out(out)
```